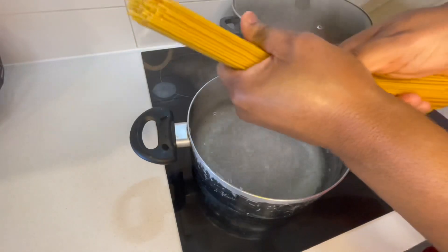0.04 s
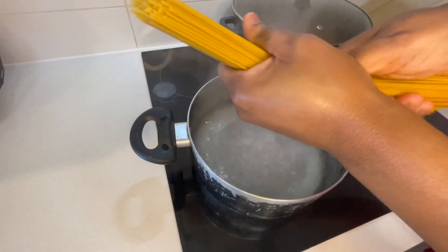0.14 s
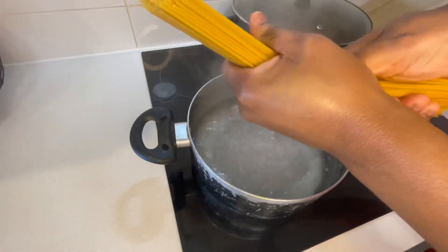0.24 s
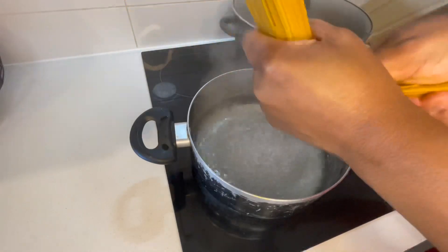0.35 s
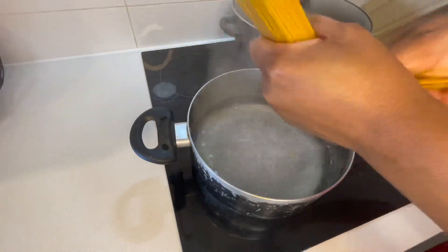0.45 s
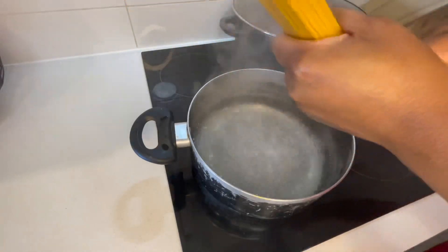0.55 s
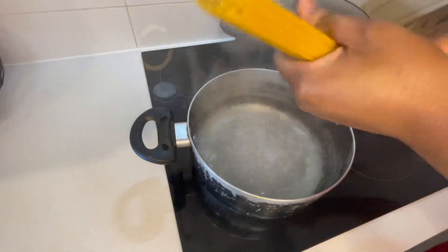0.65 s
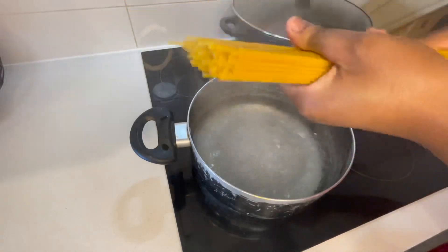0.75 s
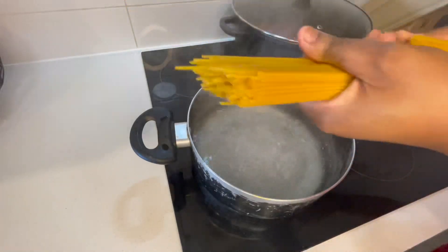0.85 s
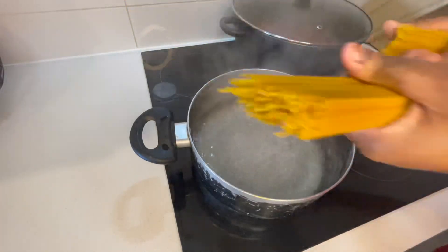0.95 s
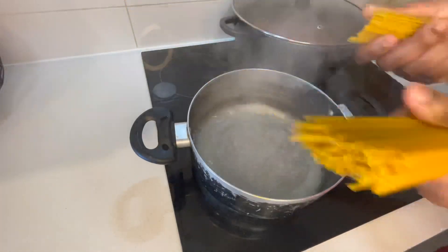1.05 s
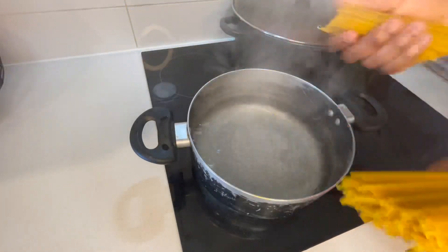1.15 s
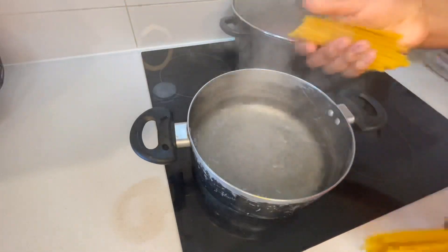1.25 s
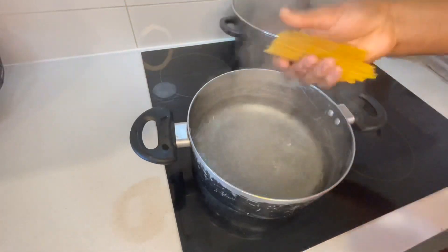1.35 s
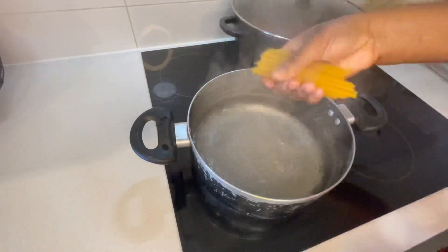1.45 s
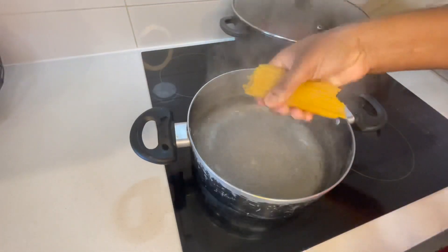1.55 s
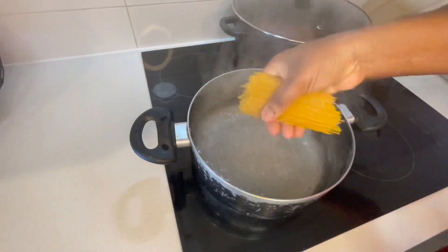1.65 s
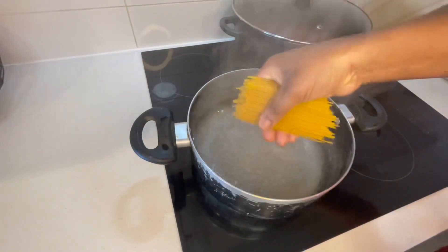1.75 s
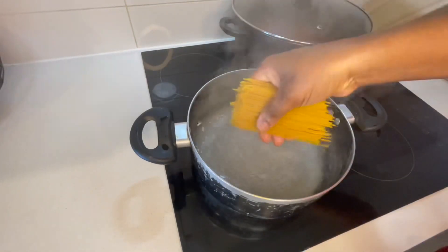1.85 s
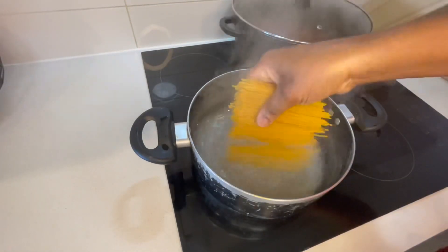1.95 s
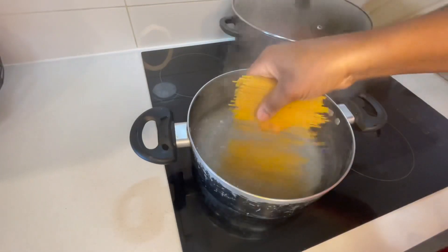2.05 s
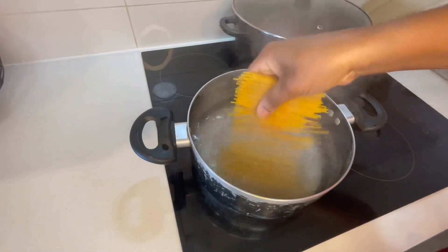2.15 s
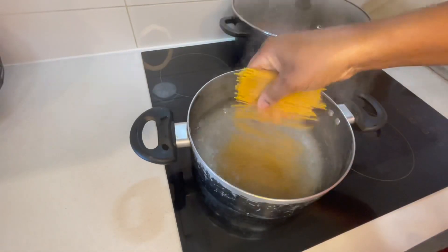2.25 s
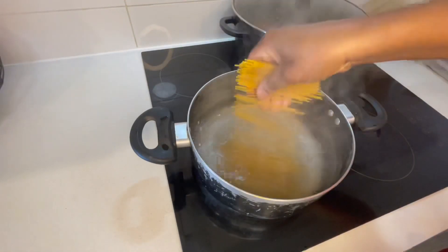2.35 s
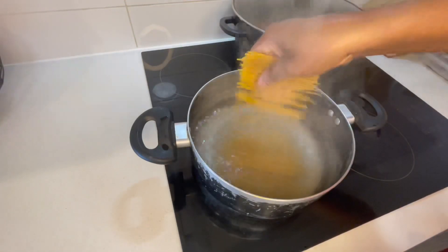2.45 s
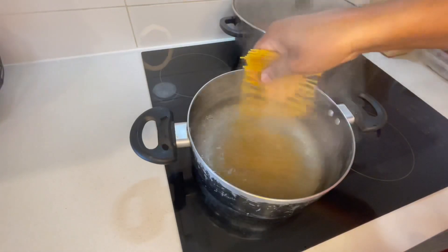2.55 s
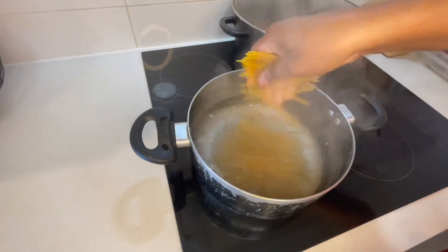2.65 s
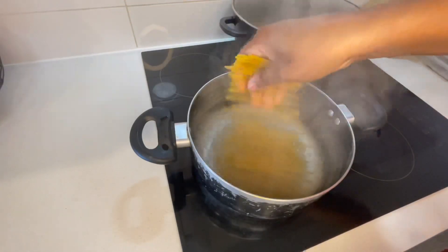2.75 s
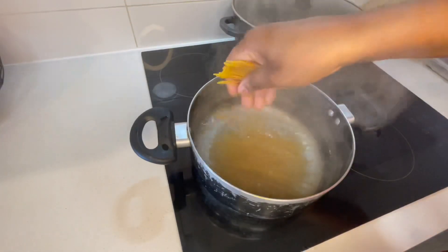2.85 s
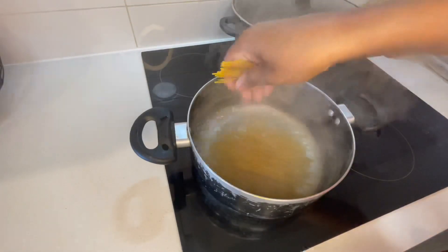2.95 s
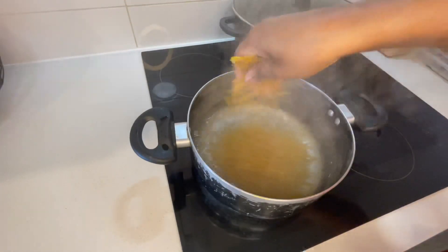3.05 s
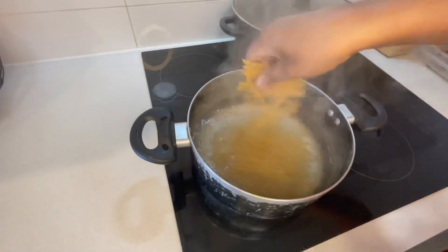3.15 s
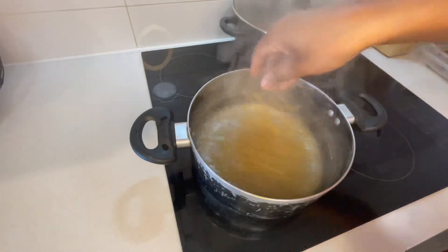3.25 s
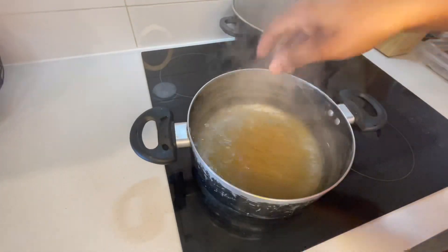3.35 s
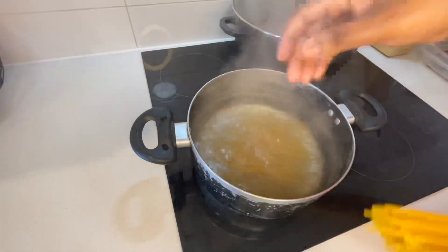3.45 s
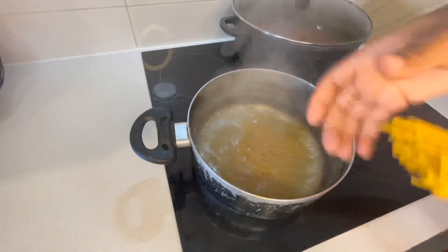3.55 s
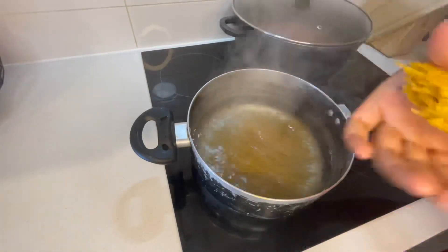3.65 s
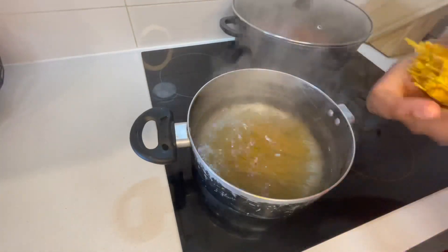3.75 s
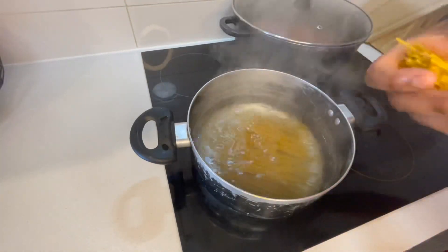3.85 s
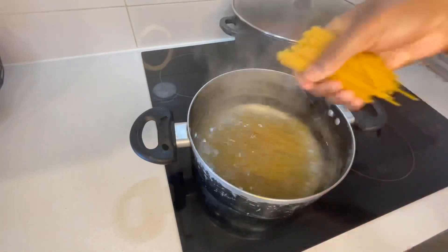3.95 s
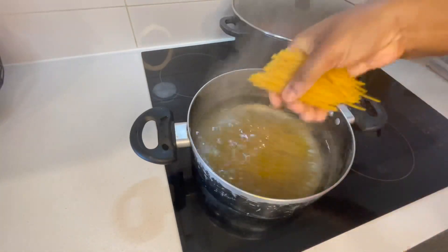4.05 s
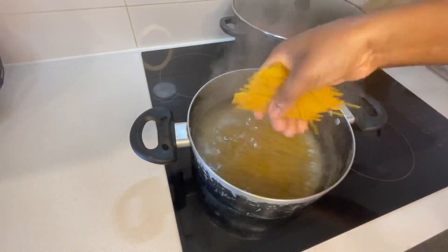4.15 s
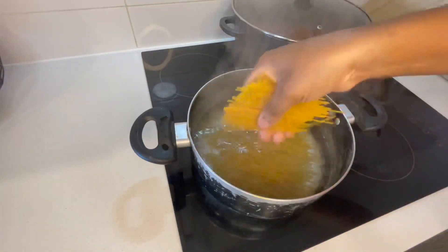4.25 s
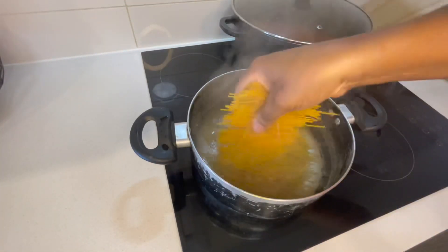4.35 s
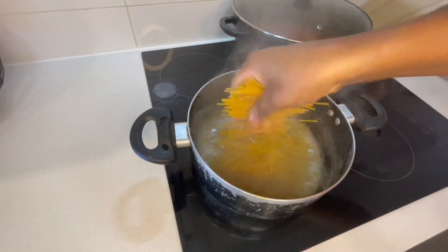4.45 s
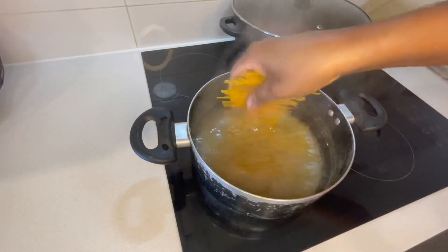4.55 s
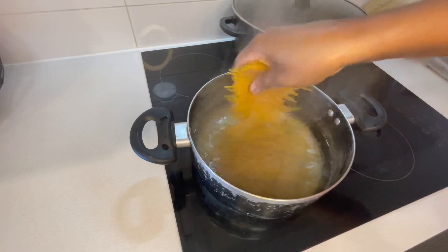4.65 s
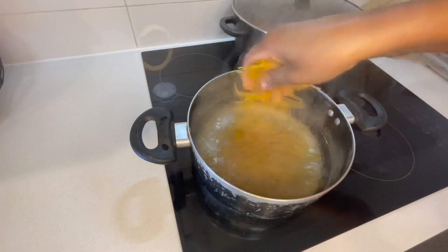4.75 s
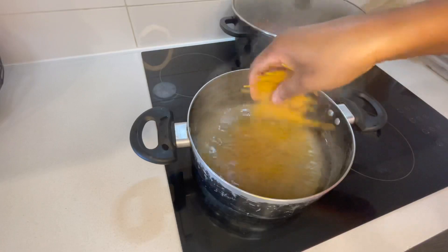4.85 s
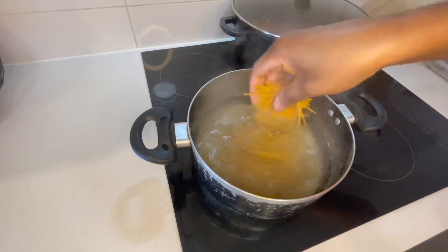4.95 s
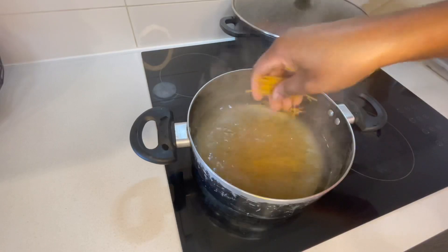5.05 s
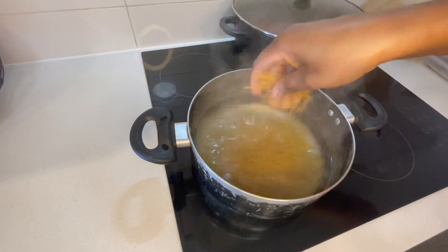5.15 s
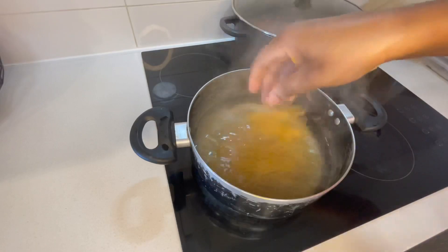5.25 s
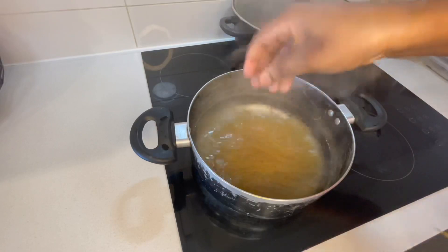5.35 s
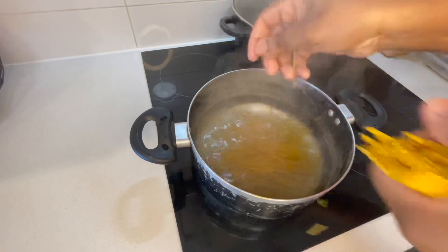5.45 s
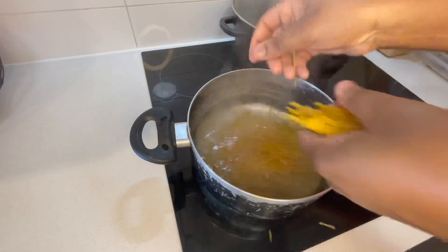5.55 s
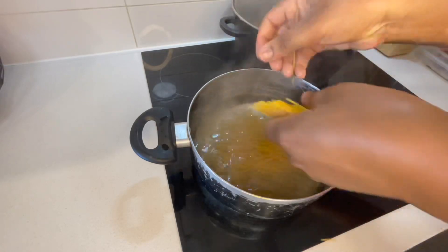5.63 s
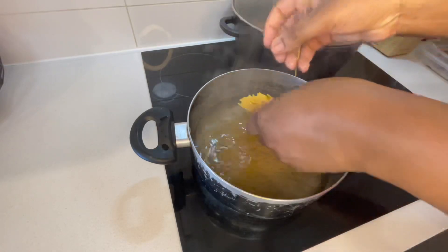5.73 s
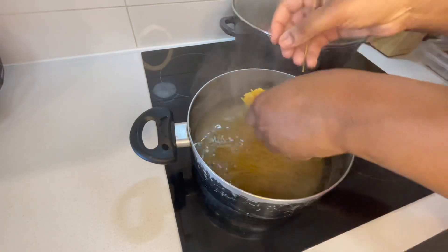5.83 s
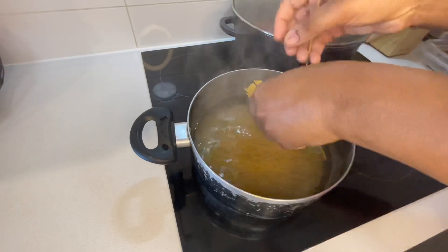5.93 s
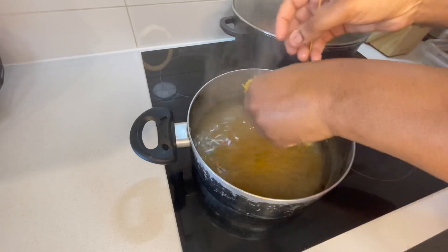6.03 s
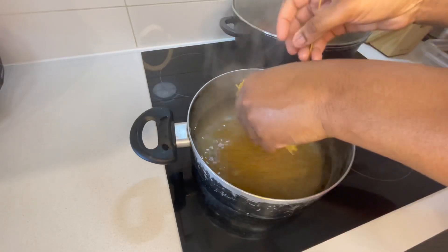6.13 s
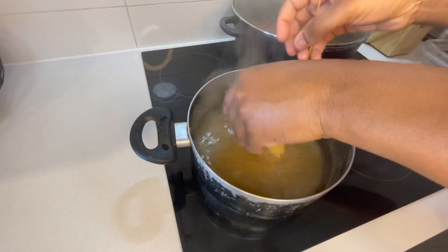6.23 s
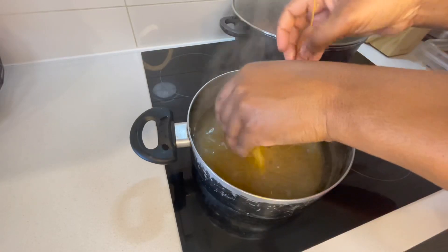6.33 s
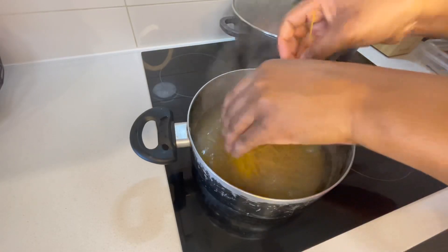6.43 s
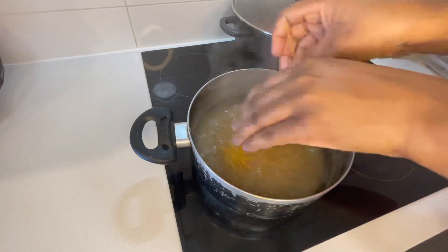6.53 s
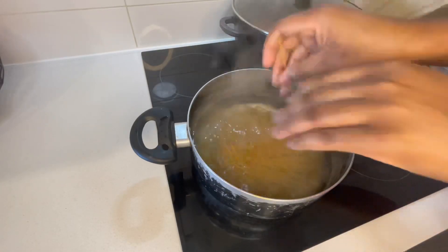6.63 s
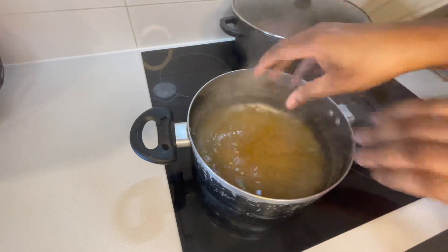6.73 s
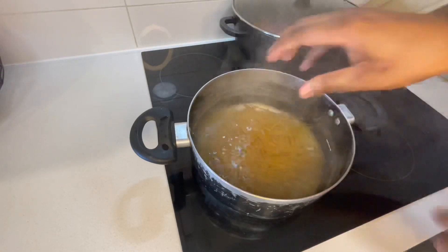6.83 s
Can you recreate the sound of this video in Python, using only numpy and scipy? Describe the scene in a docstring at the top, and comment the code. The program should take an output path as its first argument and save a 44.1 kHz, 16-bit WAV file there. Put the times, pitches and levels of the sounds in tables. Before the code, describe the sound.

Dry spaghetti snaps with a sharp crackle, then rustles and patters into a pot of simmering water in a small kitchen.

```python
"""Dry spaghetti crackles and snaps in half, then rustles and splashes into a simmering pot in three lots.
Each broken strand loads the rest, so fractures build until the bundle parts. Sliding strands scrape,
rub and ring the pot; loose bits tick against it. Bubbles hiss, plop and rumble, and the hob hums.
A small tiled kitchen adds a short tail."""
import sys
import numpy as np
from scipy import signal
from scipy.fft import rfft, irfft, next_fast_len
from scipy.io import wavfile

SR = 44100
rng = np.random.default_rng(int(sys.argv[2]) if len(sys.argv) > 2 else 0)


def wav_out(sig):
    """Save sig, one row per channel (or a flat mono array), as 16-bit PCM at SR to the path in sys.argv[1]."""
    wavfile.write(sys.argv[1], SR, np.round(np.clip(np.atleast_2d(sig).T, -1, 1) * 32767).astype(np.int16))


N = 303849
TIME = np.arange(N) / SR

# loudest cracks of the bending bundle: t/s, level/dB
SNAPS = [(.105, -27), (.131, -31), (.146, -22.5), (.1535, -17), (.164, -22), (.180, -24), (.185, -17.5),
         (.197, -18), (.217, -14), (.227, -6.5), (.231, -9.5), (.238, -18), (.272, -14), (.282, -8),
         (.288, -14), (.296, -16.5), (.302, -19)]
# resonances of a flicked short strand: f/Hz, width/Hz, gain/dB
STRAND_MODES = [(2440, 240, -4), (3060, 240, 0), (4450, 260, -12)]
# spectrum of a brittle tick: f/Hz, gain/dB
TICK_COLOUR = [(200, -19), (2400, -8.5), (4000, -11.5), (5000, 2), (11000, -1), (16000, -4)]
# spectrum of reflections: f/Hz, gain/dB
WALL_COLOUR = [(130, -7), (300, 2.5), (8000, -0.5), (9800, -19), (16000, -19)]


def breaking():
    """Single strands go first, then the whole bundle cracks, sounding deeper as it gives way."""
    snap_colour = [(100, -35), (500, -48), (1000, -15), (1800, -1.5), (5000, 1), (8000, 2), (16000, -7.5)]  # bright crack: f/Hz, gain/dB
    snap_modes = [(1114, 26, -1), (1292, 33, -1), (1770, 79, 4), (2010, 35, -1.5), (2541, 35, -2),
                  (3830, 38, 1), (4190, 60, 3)]  # ring of pot and bundle: f/Hz, width/Hz, gain/dB
    crunch_colour = [(100, -49), (350, -6.5), (650, -7), (1000, 3), (3000, -8.5)]  # low crunch: f/Hz, gain/dB
    crunch_rise = [(.1, -39), (.265, -14), (.288, -3.5)]  # growth of the crunch: t/s, gain/dB
    fractures = volleys(SNAPS, fade_s=.0032, per_s=9000, spread_db=2.2) + splintering()
    cracks = scatter(fractures, near_db=-.5, t60_s=.018, size=128)
    bright = colour(cracks, snap_colour) + body(cracks, snap_modes)
    crunch = from_db(4) * colour(cracks * from_db(in_time(crunch_rise)[0]), crunch_colour)
    return kitchen(bright + crunch, room_db=-16)


def splintering():
    """Each broken strand loads the rest: faint crackle swells to an avalanche, dying as the bundle parts."""
    onset_s, splinter_s, parted_s = SNAPS[2][0], .197, .2972
    rise_db_per_s, fall_db_per_s = 98, 409
    t = TIME - parted_s
    db = np.where(t < 0, -17 + rise_db_per_s * t, -25 - fall_db_per_s * np.minimum(t, .5))
    db -= 6 * (TIME < splinter_s)  # quieter while only bending
    return (TIME > onset_s) * from_db(db + 2 * drift(per_s=220)) * grains(per_s=7000, spread_db=2)


def sliding():
    """Strands scrape past each other, ring the pot, flick free, tick their ends and patter into the water."""
    rustle_colour = [(200, 1), (1700, -24.5), (2600, -9), (4000, -1.5), (8000, 2), (11000, 1), (16000, 7)]  # dry scraping: f/Hz, gain/dB
    splash_colour = [(100, -13), (350, -0.5), (600, 0.5), (1300, -1.5), (1650, -2), (2100, -4), (3500, -6),
                     (8000, -45)]  # patter on water: f/Hz, gain/dB
    rim_modes = [(870, 51, -12.5), (1244, 49, -5.5), (1910, 84, -11), (2390, 160, -12.5), (3150, 460, -12),
                 (4060, 130, -10)]  # pot under falling strands: f/Hz, width/Hz, gain/dB
    rustle_gain, splash_gain = flow()
    scrapes = scatter(grains(per_s=8000, spread_db=3) * from_db(1.66 * drift(per_s=70)), near_db=5)
    drops = scatter(grains(per_s=2000, spread_db=3.5) * from_db(2 * drift(per_s=70)), near_db=3)
    flicks = sum(resonate(grains(per_s=35, spread_db=2), hz, width) for hz, width, _ in STRAND_MODES)
    ends = colour(scatter(grains(per_s=90, spread_db=1.5), near_db=-6), TICK_COLOUR)
    scraping = colour(scrapes, rustle_colour) + body(scrapes, rim_modes)
    patter = colour(drops, splash_colour) + from_db(8.5) * body(drops, rim_modes)
    rustle = rustle_gain * (at_rms(scraping, 4) + at_rms(flicks, -12.5) + at_rms(ends, -4))
    splash = splash_gain * at_rms(patter, 4.5)
    return kitchen(rustle + splash + rubbing(), room_db=-10.5)


def flow():
    """Rustle and splash gains: each handful swells, holds and fades; clumps surge on top. Powers add."""
    handfuls = [(1.85, 2.879, -51.5, -56), (4.377, 5.09, -50, -64), (5.967, 6.483, -49, -66)]  # steady trickles: start/s, end/s, rustle/dB, splash/dB
    clumps = [(2.01, 0.091, -47, -51.5), (2.067, 0.019, -44, -45.5), (2.163, 0.012, -45, -64),
              (2.524, 0.013, -49, -46.5), (2.623, 0.013, -43, -46), (2.782, 0.01, -42, -71),
              (3.144, 0.036, -55, -56.5), (3.255, 0.025, -41, -49.5), (3.691, 0.0086, -49, -63),
              (3.789, 0.01, -54.5, -75), (4.33, 0.026, -51, -73), (4.446, 0.033, -44.5, -49.5),
              (4.75, 0.079, -42, -54.5), (4.934, 0.031, -39.5, -59), (5.027, 0.028, -41.5, -78),
              (5.274, 0.034, -49, -70), (5.307, 0.013, -35.5, -67), (5.531, 0.0099, -46, -54.5),
              (6.19, 0.031, -42, -55), (6.27, 0.014, -44, -71), (6.38, 0.043, -47.5, -53.5),
              (6.436, 0.036, -44.5, -50.5)]  # strands slipping together: t/s, half length/s, rustle/dB, splash/dB
    grip_opens_s, fade_s = .17, .032
    settle_ratio, roundness = 1.12, 1.59  # fall time over rise time; 1 = pointed, 2 = bell
    power = np.zeros((2, N))
    for start_s, end_s, *levels_db in handfuls:
        swell = np.clip((TIME - start_s) / grip_opens_s, 0, 1)
        fade = np.exp(-np.clip((TIME - end_s) / fade_s, 0, 20))
        power += np.outer(from_db(levels_db), swell * fade) ** 2
    for s, half_s, *levels_db in clumps:
        away = np.maximum(s - TIME, (TIME - s) / settle_ratio) / half_s
        surge = np.exp(-np.minimum(away, 20) ** roundness / 2)
        power += np.outer(from_db(levels_db), surge) ** 2
    return np.sqrt(power)


def rubbing():
    """Stick and slip: three strands ring at once, each at its own pitch within a narrow band."""
    rubs = [(2.567, 0.038, 3150, -52), (2.813, 0.053, 2450, -51), (4.77, 0.057, 3040, -45),
            (5.31, 0.019, 2450, -43.5), (6.15, 0.024, 3140, -51)]  # strand along strand: t/s, half length/s, f/Hz, level/dB
    strands = [(pitch, scatter(grains(per_s=1200, spread_db=3), near_db=2)) for pitch in (.95, 1, 1.05)]
    out = 0
    for s, half_s, hz, db in rubs:
        rings = sum(resonate(slips, hz * pitch, width_hz=100) for pitch, slips in strands)
        swell = np.exp(-((TIME - s) / half_s) ** 2 / 2)
        out += swell * at_rms(resonate(rings, hz, width_hz=700), db)
    return out


def loose_bits():
    """Brittle ticks, some a thin crack only, some ringing the strand; plus taps and a clink on the pot."""
    ticks = [(2.778, -51, -23), (2.845, -50, -30), (2.902, -35.5, -26.5), (3.218, -37, -37),
             (5.292, -32, -31), (5.456, -29.5, -50), (5.51, -36, -43), (5.62, -42.5, -46),
             (6.0097, -34, -33)]  # short runs of fractures: t/s, crack/dB, ring/dB
    times_s, *levels_db = np.transpose(ticks)
    runs = (volleys(zip(times_s, db), fade_s=.0061, per_s=6000, spread_db=3) for db in levels_db)
    cracks, rings = (scatter(run, near_db=0, t60_s=.018) for run in runs)
    ticking = from_db(1.5) * colour(cracks, TICK_COLOUR) + body(rings, STRAND_MODES)
    return kitchen(ticking + tapping() + clink(), room_db=-3.5)


def tapping():
    """A strand's end taps the pot: one sharp click and a brief ring of the strand."""
    impacts = [(2.007, -18), (2.158, -12.5), (2.282, -20), (2.663, -16), (2.795, -21), (2.903, -20),
               (3.219, -17), (3.915, -26), (4.161, -28), (4.819, -13), (4.831, -8), (5.08, -13),
               (5.134, -20.5), (5.274, -13), (6.596, -22), (6.75, -24.5)]  # end on pot: t/s, impulse level/dB
    clicks = np.zeros(N)
    for s, db in impacts:
        clicks[int(s * SR)] = from_db(db)
    taps = scatter(clicks, near_db=-5)
    return colour(taps, TICK_COLOUR) + from_db(1) * body(taps, STRAND_MODES)


def clink(start_s=1.584, level_db=-49.5):
    """One strand touches the rim and leaves a few clear partials."""
    partials = [(3278, 2, 0.088), (3570, 2, 0.072), (4447, 0.5, 0.09)]  # struck rim: f/Hz, gain/dB, t60/s
    t = np.maximum(TIME - start_s, 0)
    return sum(from_db(level_db + db - 60 * np.minimum(t / t60_s, 3)) * np.sin(2 * np.pi * hz * t)
               for hz, db, t60_s in partials)


def water():
    """Tiny bubbles hiss on the pot's floor and pop at the surface; larger ones burble and shake the pot."""
    simmer = [(0, -51, -54.5), (.48, -46, -58.5), (.75, -54, -54.5), (1.75, -51, -57.5), (2.05, -47.5, -51),
              (3.45, -70, -52), (4.2, -58, -53.5), (5.8, -62, -54), (6.89, -66, -53.5)]  # the hiss falls as pasta cools the pot: t/s, hiss/dB, rumble/dB
    hiss_colour = [(300, -10.5), (1200, -1), (4000, -3), (11000, 2), (16000, 3)]  # tiny bubbles: f/Hz, gain/dB
    burble_colour = [(20, -4), (150, 1.5), (370, -2), (520, 2), (850, -1.5), (1380, -5), (1620, -19.5),
                     (3000, -14.5), (8000, -12.5), (13000, -26)]  # larger bubbles: f/Hz, gain/dB
    pot_modes = [(68, 9.1, 3.5), (98, 13.5, 1), (116.4, 28.4, 5.5), (226, 25.4, -5)]  # low resonances of pot and hob: f/Hz, width/Hz, gain/dB
    hiss_db, rumble_db = in_time(simmer)
    tiny = scatter(grains(per_s=13000, spread_db=5), near_db=2.5)
    large = scatter(grains(per_s=2500, spread_db=4), near_db=5.5)
    hiss = at_rms(colour(tiny, hiss_colour), hiss_db)
    burble = at_rms(colour(large, burble_colour), -55)
    rumble = at_rms(body(rng.standard_normal(N), pot_modes), rumble_db + .5)
    pops = from_db(-66.5) * colour(grains(per_s=30, spread_db=2), TICK_COLOUR)
    return kitchen(hiss + pops + burble + rumble + plops(), room_db=-5.5)


def plops(fade_s=.006, rise_per_s=4):
    """A bubble rings briefly and rises in pitch as it reaches the surface."""
    bubbles = [(.986, 1010, -43), (2.509, 1050, -38.5), (4.456, 1180, -39), (5.347, 605, -40),
               (6.106, 620, -39.5), (6.383, 893, -40), (6.445, 1470, -39.5), (6.68, 474, -41.5)]  # larger bubbles bursting: t/s, starting f/Hz, level/dB
    out, t = np.zeros(N), TIME[:SR // 10]
    for s, hz, db in bubbles:
        start = int(s * SR)
        chirp = np.sin(2 * np.pi * hz * t * (1 + rise_per_s * t))
        out[start:start + len(t)] += from_db(db) * np.exp(-t / fade_s) * chirp
    return out


def hob(hum_hz=126):
    """A faint low hum that wavers in pitch and level."""
    hum = [(1.8, -76), (2.6, -52), (3.5, -52.5), (4.6, -67), (5.5, -46.5), (6.1, -60.5), (6.89, -53.5)]  # course of the hum: t/s, level/dB
    phase = 2 * np.pi * np.cumsum(hum_hz + 3 * drift(per_s=14)) / SR
    return from_db(in_time(hum)[0] + 1.3 * drift(per_s=6.5)) * np.sin(phase)


def scatter(clicks, near_db, t60_s=.024, size=512):
    """Clicks come from ever new places: each block gets its own quick reflections from pot and hob."""
    blocks, t = np.pad(clicks, (0, -N % size)).reshape(1, -1, size), TIME[:2 * size]
    trains = rng.standard_normal((2, blocks.shape[1], len(t))) * from_db(-60 * t / t60_s) * (t > .0005)
    tails = signal.fftconvolve(blocks, trains / np.linalg.norm(trains, axis=2, keepdims=True), axes=2)
    reflected, near = np.zeros((2, N + SR)), from_db(near_db)
    for k in range(blocks.shape[1]):
        reflected[:, k * size:k * size + tails.shape[2]] += tails[:, k]
    return (clicks + near * colour(reflected[:, :N], WALL_COLOUR)) / np.hypot(1, near)


def kitchen(x, room_db, t60_s=.44, delay_s=.00046):
    """Tiled walls add a dense fading train of reflections, different in each channel."""
    t = TIME[:int(t60_s * SR)]
    envelope = from_db(-60 * t / t60_s) * np.clip(t / delay_s - 1, 0, 1)
    train = rng.standard_normal((2, 2 * SR))[:, :len(t)] * envelope
    echoes = colour(train / np.linalg.norm(train, axis=1, keepdims=True), WALL_COLOUR)
    return x + from_db(room_db) * signal.fftconvolve(x, echoes, axes=1)[:, :N]


def volleys(rows, fade_s, per_s, spread_db):
    """Each row (t/s, level/dB) is a sudden run of tiny fractures that dies away."""
    clicks, out = grains(per_s, spread_db), np.zeros(N)
    for s, db in rows:
        start = int(s * SR)
        fade = np.exp(-TIME[:min(N - start, SR // 4)] / fade_s)
        run = fade * clicks[start:start + len(fade)]
        run[0] += 3.5  # the first fracture sets off the others
        out[start:start + len(fade)] += from_db(db) * run * np.sqrt(np.sum(fade ** 2) / np.sum(run ** 2))
    return out


def grains(per_s, spread_db):
    """Random clicks, many small and a few large; unit power."""
    sizes = from_db(spread_db * np.minimum(rng.exponential(1, N), 4))
    return at_rms(sizes * rng.choice([-1, 1], N) * (rng.random(N) < per_s / SR), 0)


def body(x, modes):
    """Resonances in parallel."""
    return sum(from_db(db) * resonate(x, hz, width_hz) for hz, width_hz, db in modes)


def resonate(x, hz, width_hz):
    """One resonance, unit peak gain."""
    r = np.exp(-np.pi * width_hz / SR)
    feedback = [1, -2 * r * np.cos(2 * np.pi * hz / SR), r * r]
    return signal.lfilter(np.array([1, 0, -1]) * (1 - r * r) / 2, feedback, x)


def colour(x, points, power=1):
    """Filter by a smooth spectrum (f/Hz, gain/dB)."""
    length = x.shape[-1]
    size = next_fast_len(length + 2048)
    hz, db = np.transpose(points)
    gain = from_db(power * np.interp(np.log(np.fft.rfftfreq(size, 1 / SR) + 1), np.log(hz), db))
    return irfft(rfft(x, size) * gain, size)[..., :length]


def drift(per_s):
    """Random wander between knots of unit spread."""
    knots = rng.standard_normal(8192)
    return np.interp(TIME * per_s, np.arange(len(knots)), knots)


def in_time(rows):
    """Each column of a curve at every sample."""
    s, *columns = np.transpose(rows)
    return [np.interp(TIME, s, column) for column in columns]


def at_rms(x, db):
    """Scale to unit power, then by a gain in dB."""
    return from_db(db) * x / np.sqrt(np.mean(x ** 2) + 1e-20)


def from_db(db):
    """Decibels to gain."""
    return 10 ** (np.asarray(db) / 20)


def scene():
    """Everything that sounds around the pot."""
    return breaking() + sliding() + loose_bits() + water() + hob()


def record(dry):
    """Two microphone ports resonate and turn out of phase in the treble; peaks are rounded, the top cut."""
    ports = [(8100, -0.5), (9500, 8), (10500, 11), (11400, 7), (12300, -3), (13500, -20), (16000, -27)]  # port response: f/Hz, gain/dB
    port_phase = [(1000, 0), (5000, .27), (8300, 0), (10050, -.5), (11900, -.95)]  # phase between ports: f/Hz, left lead/turns
    left_bias = [(300, 0), (1200, -1), (2500, -.5), (5500, 4.5), (7500, 4.5), (8800, 0)]  # more upper middle on the left: f/Hz, left minus right/dB
    full_scale, cutoff_hz = .8, 15900
    left, right = colour(dry, ports)
    size = next_fast_len(N + SR)
    turns = np.interp(np.fft.rfftfreq(size, 1 / SR), *np.transpose(port_phase))
    right = irfft(rfft(right, size) * np.exp(-2j * np.pi * turns), size)[:N]
    pair = np.array([colour(left, left_bias, power=.5), colour(right, left_bias, power=-.5)])
    rounded = full_scale * np.tanh(pair / full_scale)
    return signal.sosfilt(signal.ellip(12, .1, 80, cutoff_hz, fs=SR, output="sos"), rounded)


dry = scene()
out = record(dry)
wav_out(out)
```